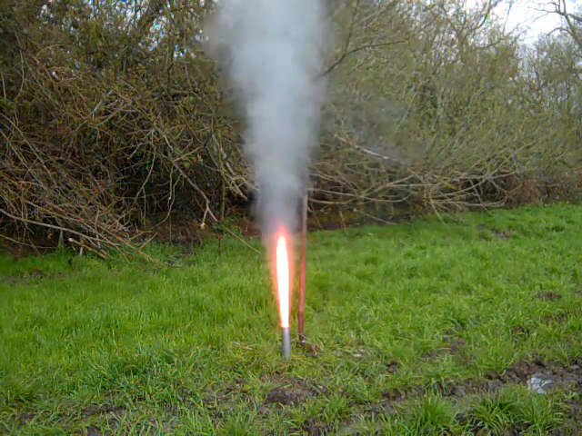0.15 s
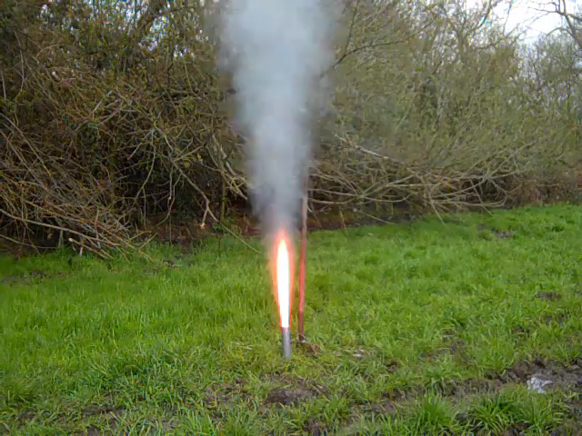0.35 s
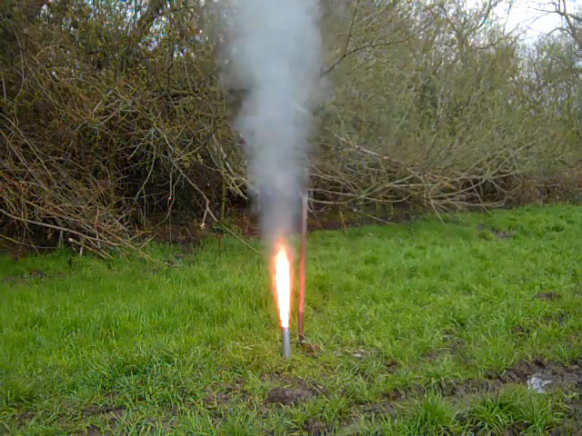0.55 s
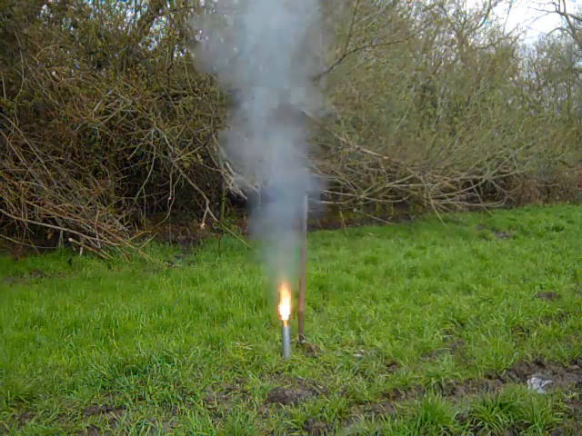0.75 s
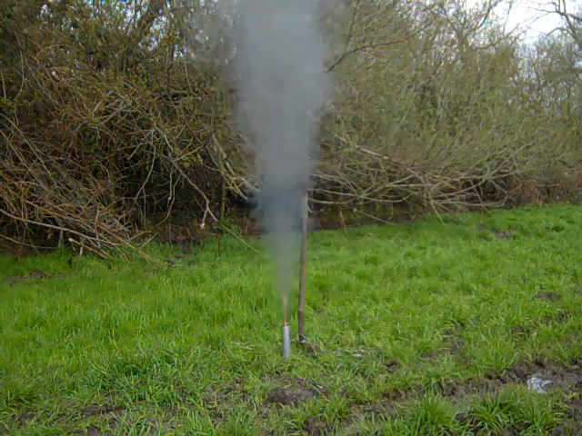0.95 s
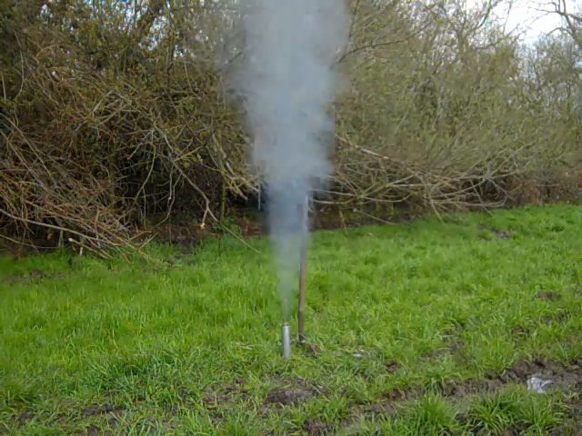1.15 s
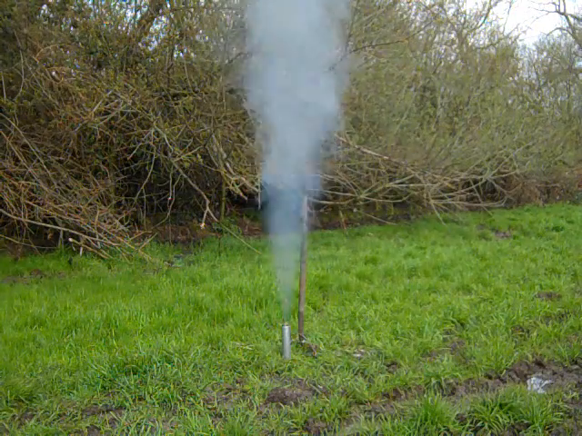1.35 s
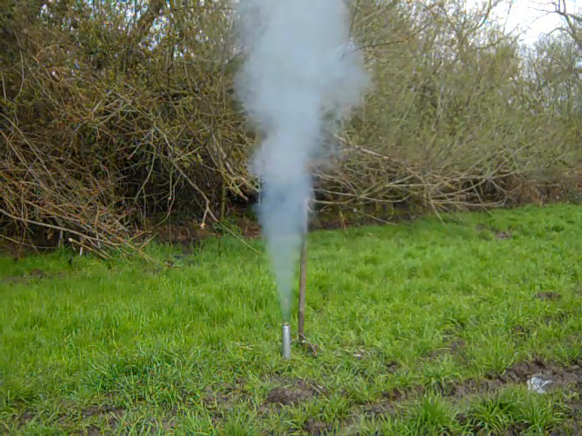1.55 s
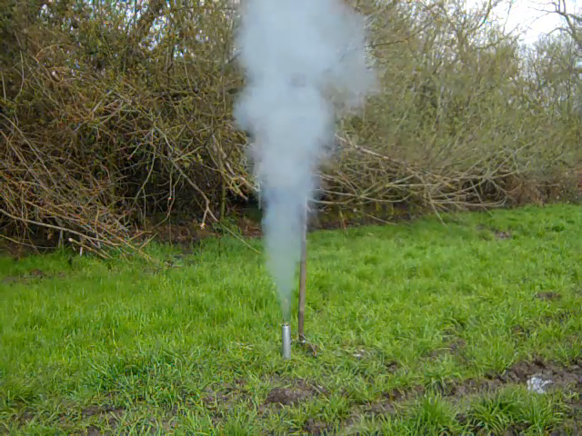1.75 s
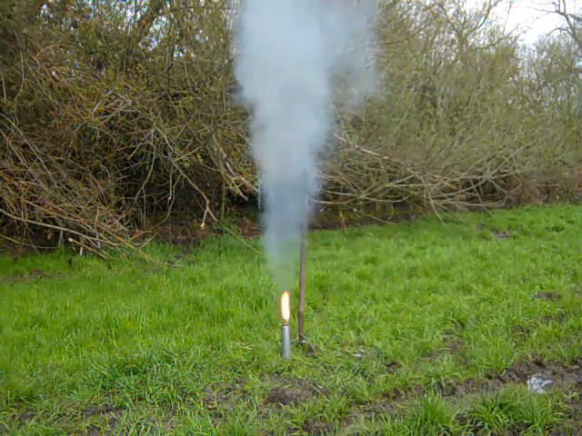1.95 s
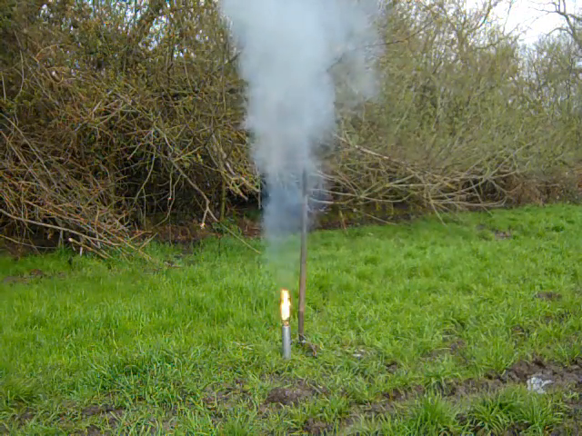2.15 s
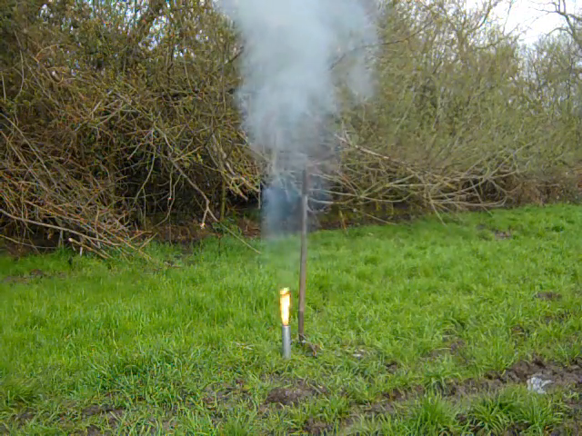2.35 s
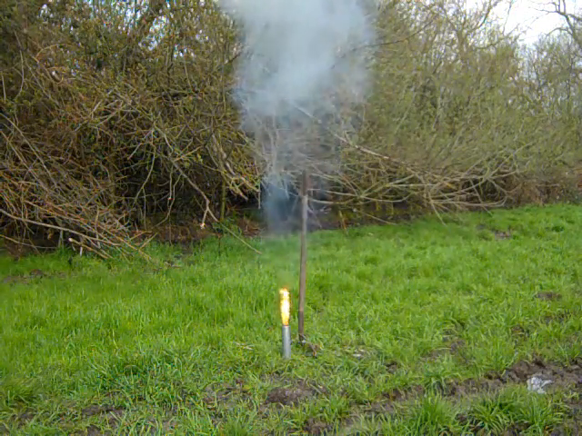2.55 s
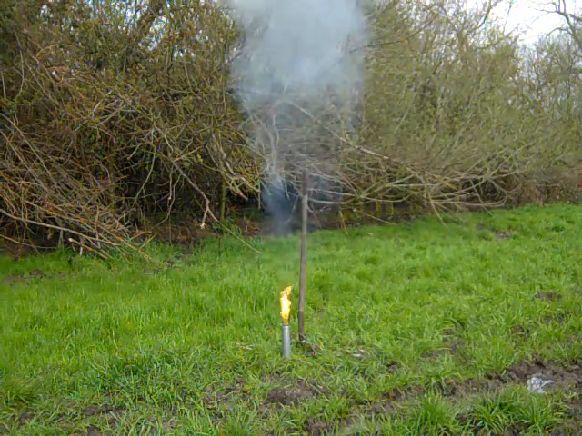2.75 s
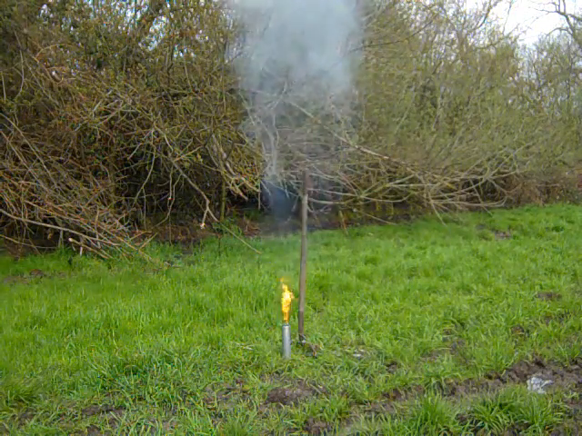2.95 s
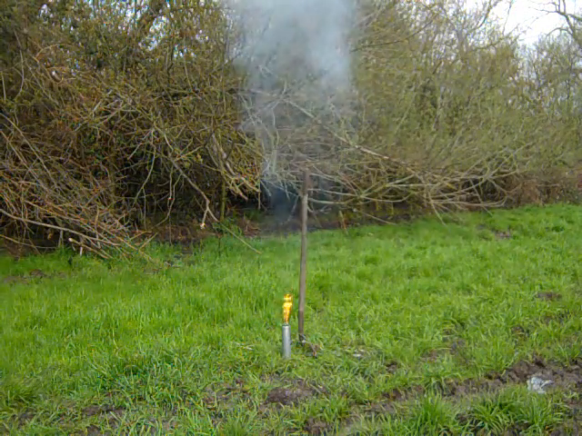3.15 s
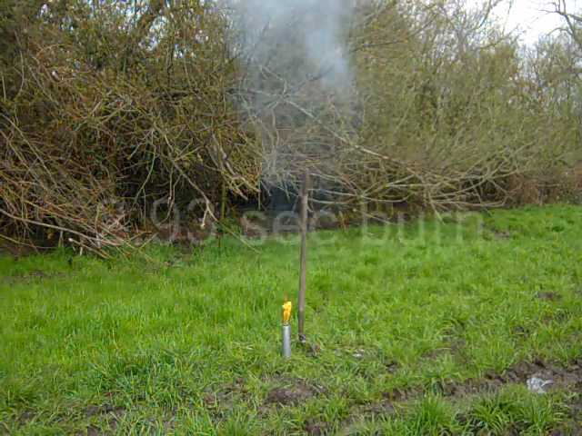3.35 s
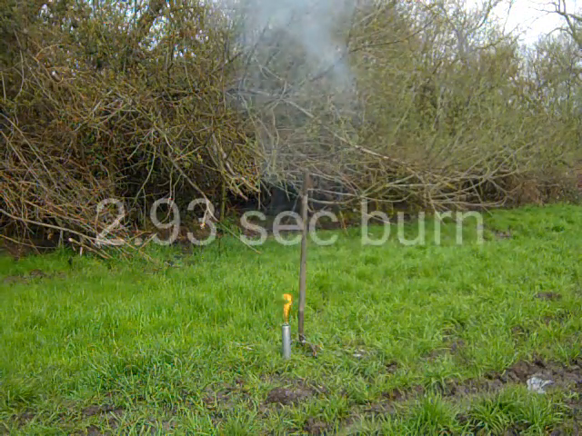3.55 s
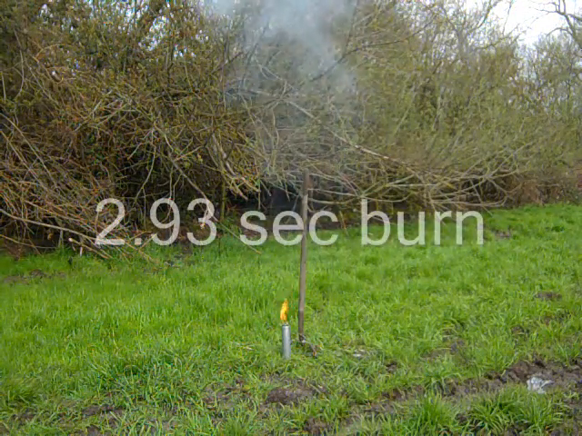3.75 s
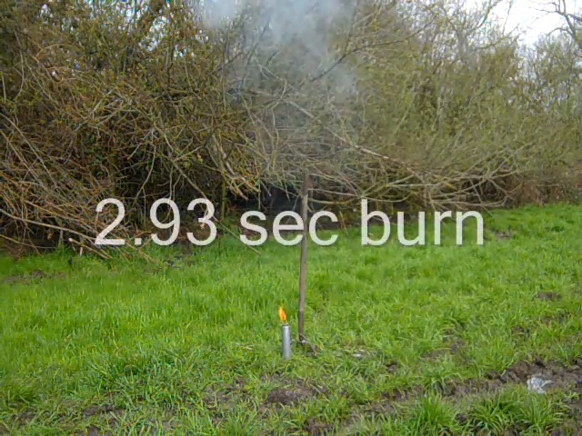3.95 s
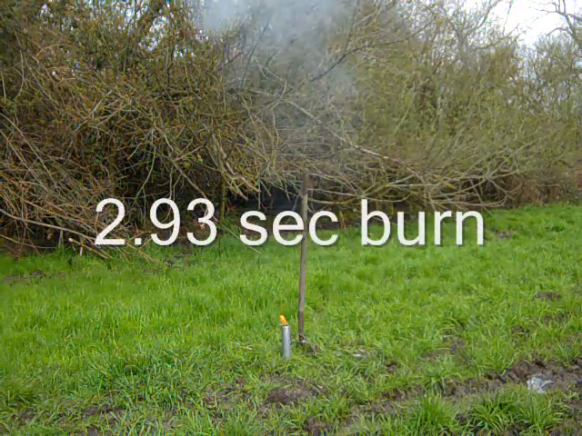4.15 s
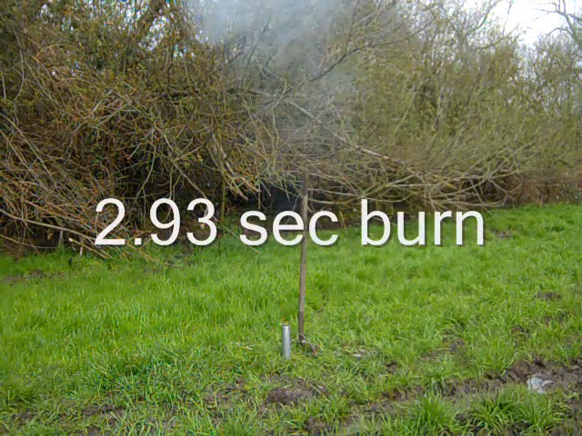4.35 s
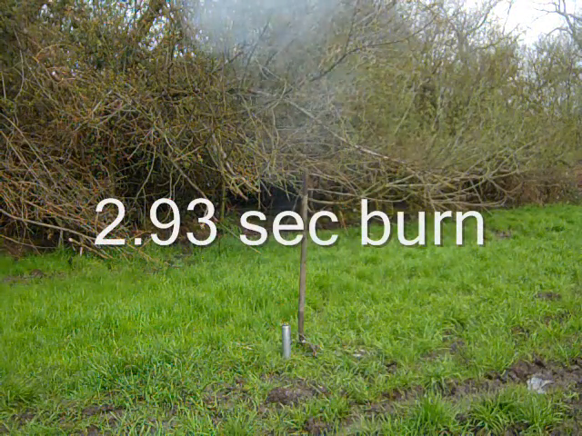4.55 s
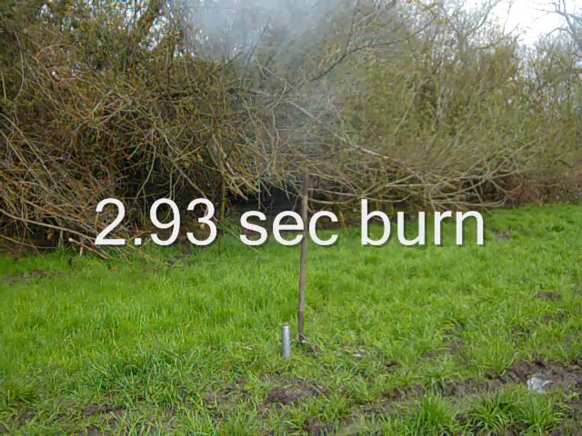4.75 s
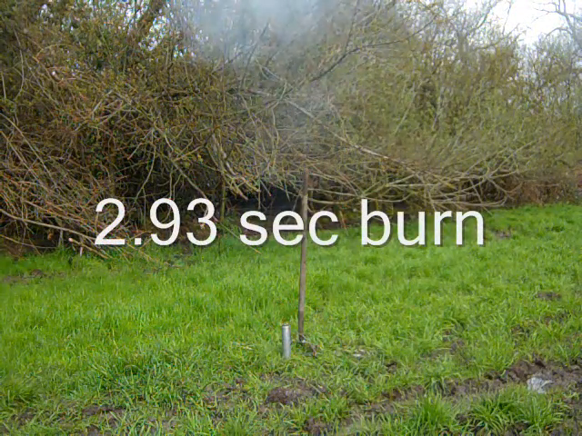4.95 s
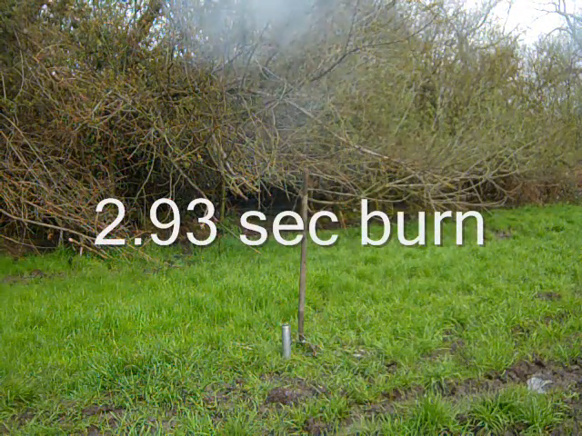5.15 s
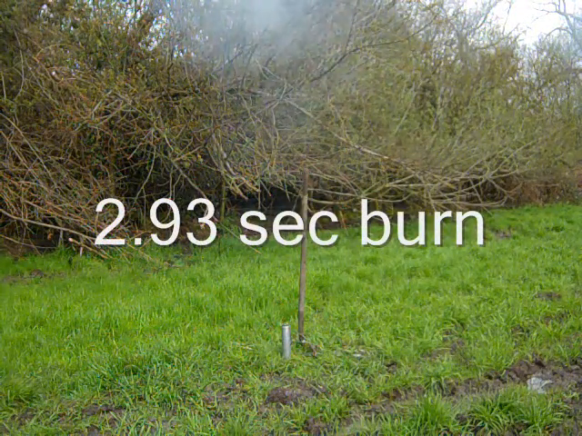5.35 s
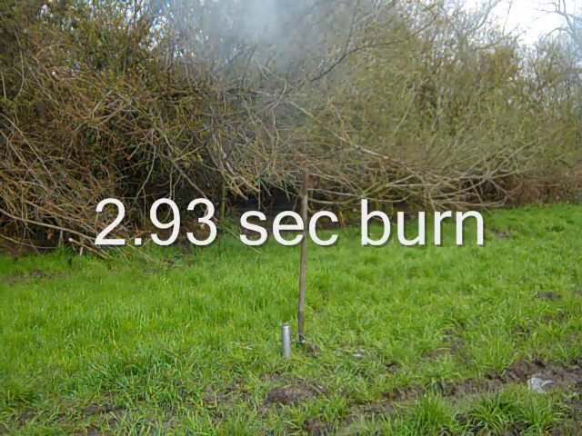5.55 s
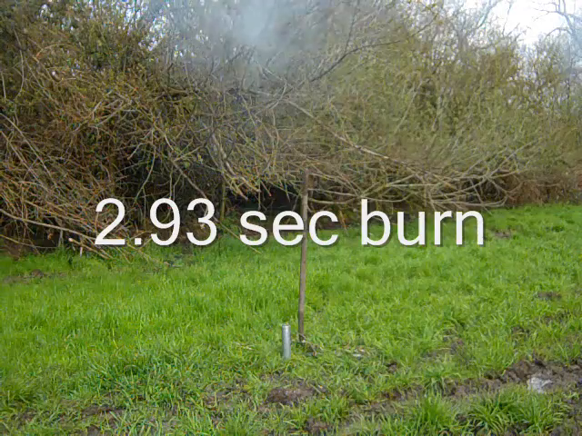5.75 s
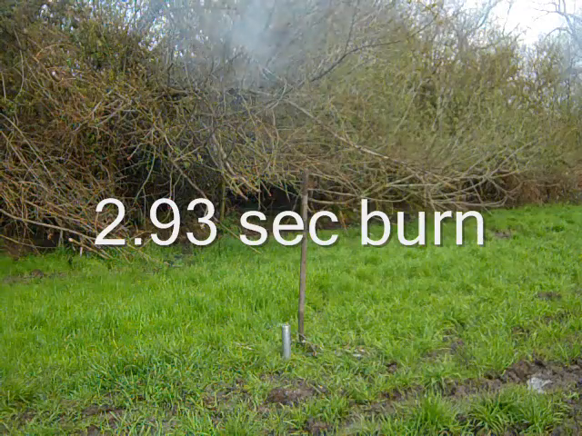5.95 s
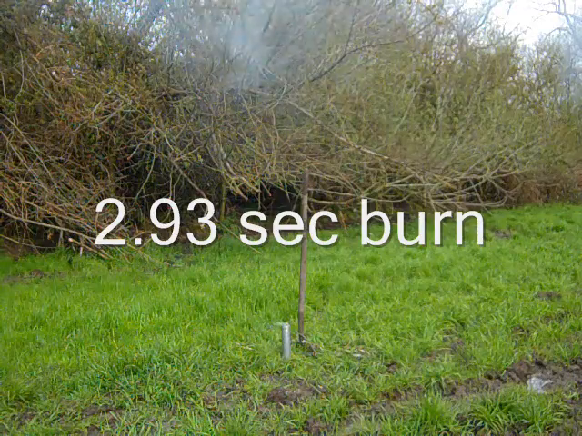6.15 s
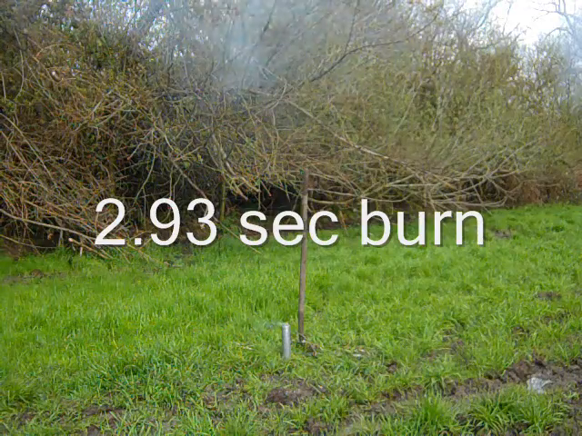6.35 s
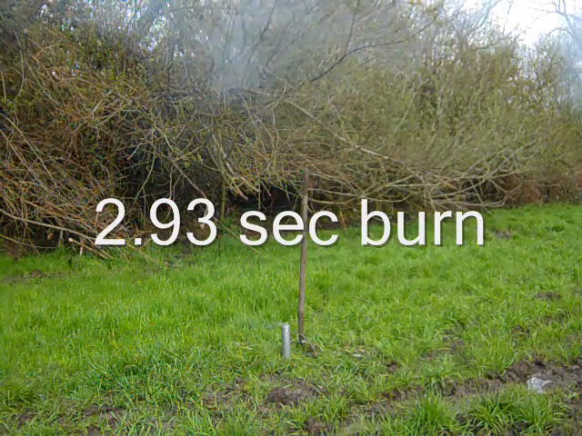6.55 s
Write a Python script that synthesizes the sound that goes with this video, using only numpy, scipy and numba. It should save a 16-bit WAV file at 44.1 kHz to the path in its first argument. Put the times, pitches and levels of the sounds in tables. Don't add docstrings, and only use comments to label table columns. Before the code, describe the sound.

Distorted gas-jet blast for one second, a quick screech, fading hiss, a rapid string of popping relights, faint tonal blips, then quiet field hush.

```python
import sys
import numpy as np
from scipy import signal
from scipy.fft import rfft, irfft
from scipy.io import wavfile
from scipy.ndimage import uniform_filter1d
from numba import njit

SR = 44100
rng = np.random.default_rng(int(sys.argv[2]) if len(sys.argv) > 2 else 0)


def dump_mix(stems):
    frames = np.atleast_2d(stems).T
    limited = np.clip(frames, -1, 1)
    pcm = np.round(limited * 32767).astype(np.int16)
    wavfile.write(sys.argv[1], SR, pcm)


def invert_db(x):
    u = np.asarray(x, float) / 20
    return 10 ** u


N = 291942
TIME = np.arange(N) / SR
HZ = np.maximum(np.fft.rfftfreq(N, 1 / SR), 1)

# (frequency [Hz], level per Hz [dB])
FIELD_COLOUR = [(12, -38), (20, 4), (49, -5.5), (76, -5), (108, -4), (263, -5.5), (555, -14), (889, -11),
                (3270, -22.5), (6360, -25), (7930, -17), (9900, -34.5), (13800, -42), (15000, -53)]
# (frequency [Hz], likeness [-1 to 1])
FIELD_ALIKE = [(60, 0.4), (130, 0.99), (290, 0.78), (630, 0.87), (1390, 0.53), (3050, 0.29), (6680, -0.56),
               (14600, 0.01)]

# (time [s], level [dB])
FLUTTER = [(1.9, -40), (2.07, -35), (2.1, -21), (2.3, -26), (2.43, -22), (2.7, -30), (3.07, -47.5),
           (3.15, -47), (3.9, -60.5)]
# (frequency [Hz], level per Hz [dB])
FLAME_COLOUR = [(18, -56), (30, -35), (113, -6.5), (217, -1), (452, -6), (522, -10), (697, -9.5),
                (762, -14.5), (2200, -14.5), (2860, -37), (4840, -120)]
# (time [s], frequency [Hz], level [dB])
CASING_NOTE = [(2.4, 1460, -52), (2.9, 1445, -59), (3.5, 1430, -60), (3.7, 1400, -75)]

# (time [s], peak [dB], frequency [Hz], length [ms])
BLIPS = [
    (2.425, -22, 2160, 32),
    (2.507, -30, 1485, 23),
    (2.927, -50, 1260, 18),
    (3.098, -42, 1470, 25),
    (3.254, -37, 1420, 25),
    (3.32, -56, 1395, 40),
    (3.44, -49, 1195, 30),
    (3.474, -49, 1440, 22),
    (3.552, -53, 1150, 20),
]

# (time [s], peak [dB], swing [Hz], gas level against the peak [dB])
POPS = [(1.9024, -5.5, 460, -8.5), (1.911, -4, 415, -14.5), (1.9396, -6, 397, -7), (1.9467, -15, 600, -24),
        (1.9862, -10, 216, -11.5), (1.9912, -10.5, 960, -38), (2.007, -7, 358, -11.5),
        (2.0241, -8, 437, -11.5), (2.0535, -5, 390, -18.5), (2.06, -15, 370, -18), (2.0851, -11, 332, -31),
        (2.0904, -7.5, 372, -29), (2.097, -7.5, 430, -15), (2.1077, -11, 290, -14.5),
        (2.119, -10, 470, -16), (2.1259, -22, 280, -4), (2.134, -37, 250, -7), (2.1466, -14, 390, -37),
        (2.155, -16, 312, -7.5), (2.1974, -29.5, 400, 7), (2.2359, -13, 330, -11),
        (2.2448, -16, 686, -14.5), (2.2555, -12.5, 463, -33), (2.2607, -19, 375, -20)]
# (time [s], peak [dB], swing [Hz])
EMBERS = [(2.701, -28, 150), (2.884, -33, 151), (2.945, -31, 300), (2.974, -31.5, 360), (3.047, -34, 300),
          (3.0285, -31, 290), (3.0661, -33, 280), (3.075, -35, 220), (3.169, -37, 179), (3.2112, -42, 270),
          (3.4764, -55, 220)]
# (time [s], peak [dB], length [ms])
SPITS = [
    (1.7935, -24, 7),
    (1.8244, -33, 8),
    (2.027, -16, 15),
    (2.8933, -37, 6.8),
]
# (frequency [Hz], level per Hz [dB])
GAS_COLOUR = [(400, -15), (900, 1), (1900, 3.5), (2800, -0.5), (3500, -9), (4500, -8.5), (6000, -9),
              (7800, -6), (11000, -26.5)]

# (time [s], level [dB])
GAS_FLOW = [(0, -4), (.8, -0.5), (1.0, -14.5), (1.07, -15), (1.13, -9.5), (1.21, -15), (1.32, -24.5),
            (1.54, -23.5), (1.6, -22), (1.8, -19), (1.89, -22.5), (2.04, -30), (2.12, -34.5), (2.3, -29),
            (2.44, -27), (2.6, -32), (2.87, -56.5), (3.05, -74)]
# (time [s], frequency [Hz], level [dB])
JET_SLIDE = [(.9, 7840, -18), (1.13, 8100, -12), (1.23, 8240, -21), (1.36, 7580, -20), (1.5, 7240, -25.5),
             (1.68, 6840, -24), (1.95, 7400, -61)]
# (frequency [Hz], level per Hz [dB])
HISS_COLOUR = [(150, -79), (300, -28), (2060, -29.5), (3500, -8), (3720, -12.5), (4950, -9.5), (6050, -7.5),
               (6800, -2), (7870, 2.5), (8500, -4.5), (9330, -13.5), (13700, -25), (15000, -31)]
# (frequency [Hz], level per Hz [dB])
CASING_COLOUR = [(200, -47), (470, -9), (800, -8.5), (1100, -10.5), (1480, -3), (1680, -4.5), (2090, 2),
                 (2670, 8), (3300, 0), (4320, -7), (6000, -3.5), (9000, -42)]
# (frequency [Hz], likeness [0 to 1])
JET_ALIKE = [(3000, 0.36), (6000, 0.73), (8000, 1), (10000, 0.17), (14600, 0.21)]
# (frequency [Hz], likeness [-1 to 1])
MOTOR_ALIKE = [(60, 0.46), (130, 1), (290, 0.97), (630, 1), (1390, 0.76), (3050, 0.85), (6680, 0.39),
               (14600, 0.08)]

# (frequency [Hz], difference [dB])
LEAN = [(60, 3.1), (110, 5), (200, 4.7), (380, 4.7), (690, 4.5), (1270, 5.3), (2340, 8.2), (4320, 6.2),
        (7950, 9.8), (14600, 42)]
# (frequency [Hz], level per Hz [dB])
HASH_COLOUR = [(20, 0), (100, 1.5), (500, 2.5), (2000, 1.5), (5000, -3), (8000, 2.5), (11000, -5),
               (15000, -11), (22000, -18)]
# (frequency [Hz], level per Hz [dB])
THUD_COLOUR = [(20, -11.5), (60, -3), (250, -2), (600, -10), (1500, -15), (5000, -63)]
# (frequency [Hz], likeness [0 to 1])
OVERLOAD_ALIKE = [(20, .05), (4000, 0.069), (7500, 0.37), (11000, 0.14), (15000, 0.071)]


def curves(table):
    s, *columns = np.transpose(table)
    return [np.interp(TIME, s, column) for column in columns]


def along_hz(table):
    hz, value = np.transpose(table)
    return np.interp(np.log(HZ), np.log(hz), value)


def ramp(from_s, to_s):
    return np.clip((TIME - from_s) / (to_s - from_s), 0, 1)


def unit(x):
    return x / np.std(x.mean(axis=0))


def pair(colour, alike, x=None):
    like = np.clip(along_hz(alike), 0, 1)
    source = rng.standard_normal((2, N)) if x is None else x
    mid, side = rfft(source) * invert_db(along_hz(colour))
    mid = mid * np.sqrt(1 + like)
    side = side * np.sqrt(1 - like)
    return irfft([mid + side, mid - side], N)


def walk(rate):
    k = int(SR / rate)
    steps = np.repeat(rng.standard_normal(N // k + 1), k)
    return 1.18 * uniform_filter1d(uniform_filter1d(steps, k), k)[:N]


@njit
def band(x, hz, width):
    y, b, l = np.empty(len(x)), 0., 0.
    for i in range(len(x)):
        g, k = np.tan(np.pi * hz[i] / SR), width / hz[i]
        v = (b + g * (x[i] - l)) / (1 + g * (g + k))
        b, l, y[i] = 2 * v - b, l + 2 * g * v, k * v
    return y


def narrow(table, width_hz, flicker_db):
    hz, db = curves(table)
    ring = band(rng.standard_normal(N), hz, width_hz)
    sounding = (TIME > table[0][0]) * (TIME < table[-1][0])
    return sounding * ring / np.std(ring) * invert_db(db + flicker_db * walk(39.66))


def burst(s, db, rise_s, fall_s):
    t = np.maximum(TIME - s, 0)
    return invert_db(db) * (1 - np.exp(-t / rise_s)) * np.exp(-t / fall_s)


def puff(hz, rise=0.23, fall=0.59):
    turn = np.arange(-256, 1500) / SR * hz
    climb = np.exp(np.minimum(turn, 0) / rise)
    swing = np.cos(2 * np.pi * 0.85 * turn) * np.exp(-abs(turn) / fall)
    return np.where(turn < 0, climb, swing)


def field():
    hush = rfft(unit(pair(FIELD_COLOUR, FIELD_ALIKE)))
    low = 1 / (1 + (HZ / 200) ** 16) / (1 + (65 / HZ) ** 12)
    cut_db = np.where(TIME < 1.56, -30, -5 * (TIME < 1.9))
    stir_db = 0.45 * walk(11) + 0.44 * walk(1.2)
    bass = irfft(hush * low, N) * invert_db(cut_db + stir_db)
    return invert_db(-48.5) * (bass + irfft(hush * (1 - low), N))


def flame():
    puffs_per_s = 900
    sizes = invert_db(2.5 * rng.exponential(size=(2, N))) * (rng.random((2, N)) < puffs_per_s / SR)
    puffs = unit(pair(FLAME_COLOUR, MOTOR_ALIKE, sizes - sizes.mean()))
    lit = (TIME > FLUTTER[0][0]) * (TIME < FLUTTER[-1][0]) * invert_db(curves(FLUTTER)[0])
    licks = sum(burst(s, db - 17.5, .003, 0.018) for s, db, *_ in POPS)
    lit = np.maximum(lit, licks)
    blurred = 0.41 * puffs + 0.83 * unit(pair(FLAME_COLOUR, MOTOR_ALIKE))
    flutter = lit * invert_db(0.61 * walk(35.16)) * blurred
    return flutter + narrow(CASING_NOTE, width_hz=60., flicker_db=2.8)


def blips():
    out = np.zeros(N)
    for s, db, hz, ms in BLIPS:
        x = np.clip((TIME - s + 0.00396) / (ms / 1000), 0, 1)
        turns = hz * ms / 1000 * (.92 * x + .07 * x ** 2)
        out += invert_db(db) * np.sin(np.pi * x) ** 2 * np.sin(2 * np.pi * turns)
    return out * invert_db(3 * walk(200))


def pops():
    push, gust = np.zeros(N), np.zeros(N)
    ember_gas_db = -16
    for s, db, hz, gas_db in POPS + [(*row, ember_gas_db) for row in EMBERS]:
        shape, i = puff(hz), int(s * SR) - 256
        push[i:i + len(shape)] += invert_db(db + 3.5) * shape
        gust += burst(s, db + gas_db + 2.5, 0.0001, 0.0065)
    for s, db, ms in SPITS:
        gust += burst(s, db, ms / 4000, ms / 1000)
    return push + gust * unit(pair(GAS_COLOUR, MOTOR_ALIKE))


def casing_roar(gas_db):
    hollow = ramp(1.95, 1.95 + 0.34)
    full_db = np.minimum(-33 + 0.5 * (gas_db + 19.5), -22.5)
    hollow_db = -28.5 + 0.76 * (gas_db + 29)
    roar_db = (1 - hollow) * full_db + hollow * hollow_db
    surge = burst(1.1, -17, rise_s=.03, fall_s=.05)
    return unit(pair(CASING_COLOUR, MOTOR_ALIKE)) * (invert_db(roar_db) + surge) * invert_db(0.88 * walk(25))


def screech():
    start_s, long_s, start_hz, sag_hz_per_s = 1.112, .1, 9620, 7500
    x = ramp(start_s, start_s + long_s)
    hz = start_hz - sag_hz_per_s * long_s * x + 60 * walk(300)
    shape = np.sqrt(abs(np.sin(np.pi * x))) * (x < 1)
    return np.sin(2 * np.pi * np.cumsum(hz) / SR) * invert_db(-11.5 + 2 * walk(70)) * shape


def jet():
    gas_db = curves(GAS_FLOW)[0]
    hiss = unit(pair(HISS_COLOUR, JET_ALIKE)) * invert_db(gas_db + 1.7 * walk(14))
    flowing = TIME < GAS_FLOW[-1][0]
    peak = narrow(JET_SLIDE, width_hz=610.0, flicker_db=1.85)
    return flowing * (hiss + casing_roar(gas_db)) + peak + screech()


def scene():
    return field() + flame() + blips() + pops() + jet()


def squash(x, top_db):
    return x / (1 + abs(x / invert_db(top_db)) ** 4) ** (1 / 4)


def overload():
    sag_s, collapse_s, end_s = 0.96, 1.112, 1.385
    sagged_s = np.maximum(TIME - sag_s, 0)
    collapsed_s = np.maximum(TIME - collapse_s, 0)
    over_db = 60 * ramp(end_s - .02, end_s + 0.0092)
    hash_db = -16 - 40 * sagged_s - 122 * collapsed_s - over_db
    thud_db = -34 + 10 * ramp(sag_s - .08, sag_s) - 68 * sagged_s - over_db
    lean_db = 1.5 + (22 - 1.5) * ramp(1.086, 1.136)
    folded = unit(pair(HASH_COLOUR, OVERLOAD_ALIKE)) * invert_db(hash_db + 1.0 * walk(18.1))
    folded += unit(pair(THUD_COLOUR, OVERLOAD_ALIKE)) * invert_db(thud_db + 3.5 * walk(60))
    return folded * invert_db(np.array([lean_db, -lean_db]) / 2)


def band_limit(x):
    return signal.sosfilt(signal.butter(12, 14450, fs=SR, output="sos"), x)


def record(dry):
    right = invert_db(-along_hz(LEAN))
    early = np.exp(1j * 2 * np.pi * HZ / SR * 0.47)
    gains = np.array([2 / (1 + right), 2 * right * early / (1 + right)])
    ports = irfft(rfft(dry) * gains, N)
    ports = signal.sosfilt(signal.butter(2, 45, "high", fs=SR, output="sos"), ports)
    ceiling_db = -10 + (5 + 10) * ramp(1.134, 1.68)
    full = squash(ports, ceiling_db) + overload()
    full = squash(full, ceiling_db + 3.5)
    treble_cut = signal.ellip(12, .2, 80, 14300, fs=SR, output="sos")
    mix = signal.sosfilt(treble_cut, np.clip(full, -1.1, 1.1))
    return band_limit(np.clip(mix, -1, 1))


dry = scene()
out = record(dry)
dump_mix(out)
```